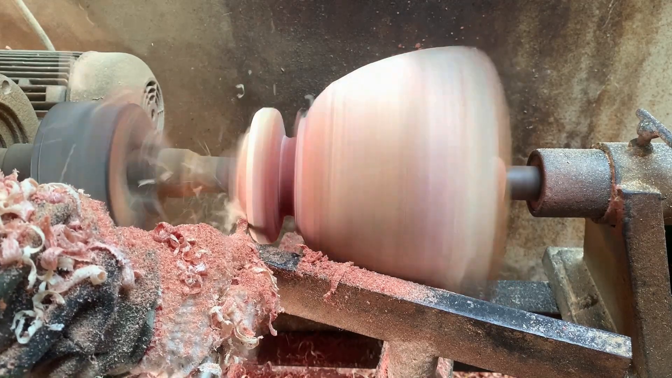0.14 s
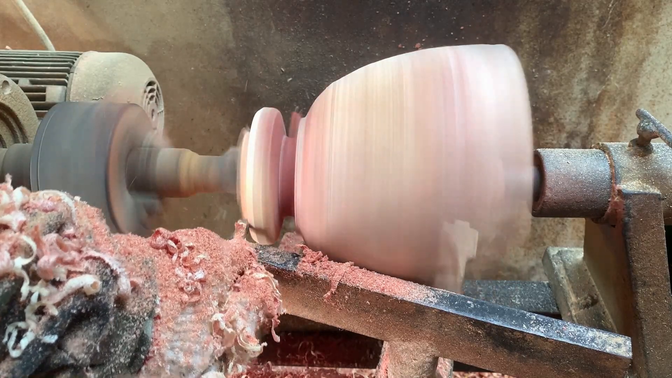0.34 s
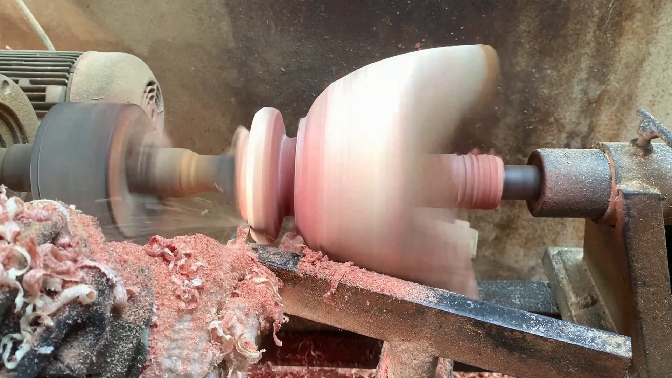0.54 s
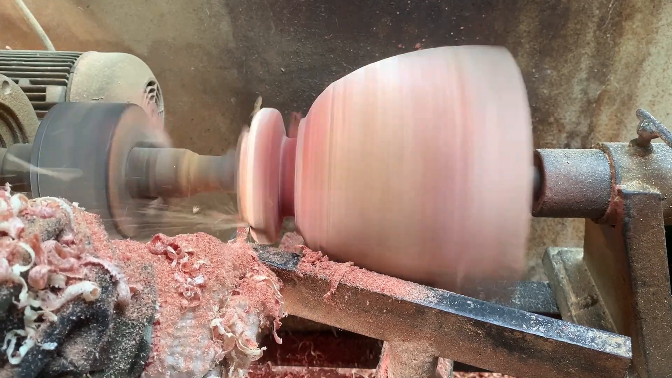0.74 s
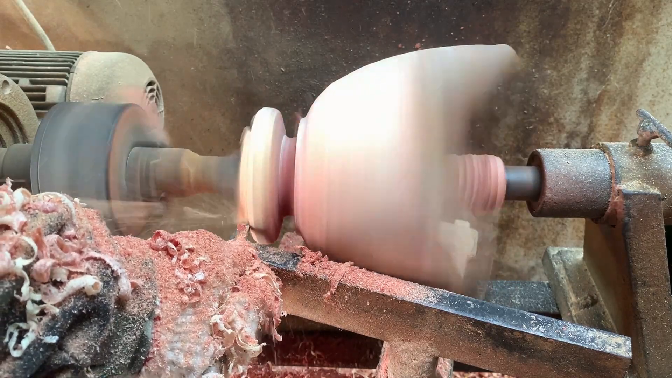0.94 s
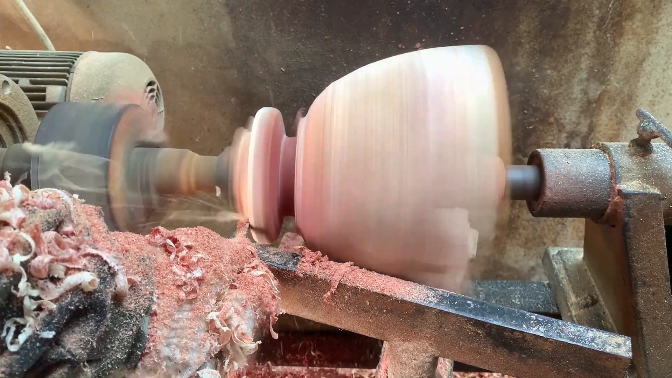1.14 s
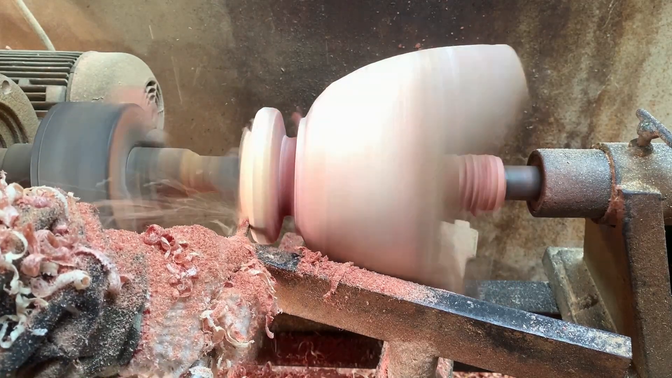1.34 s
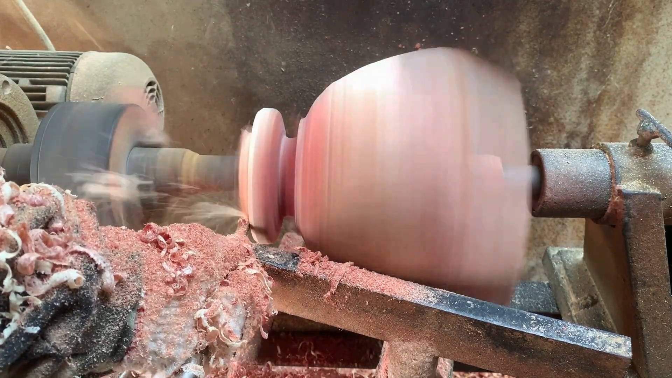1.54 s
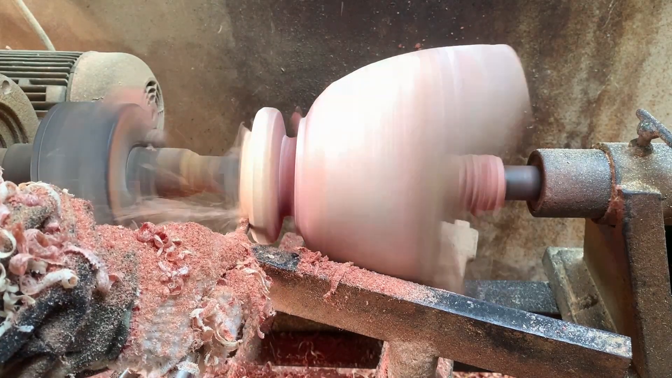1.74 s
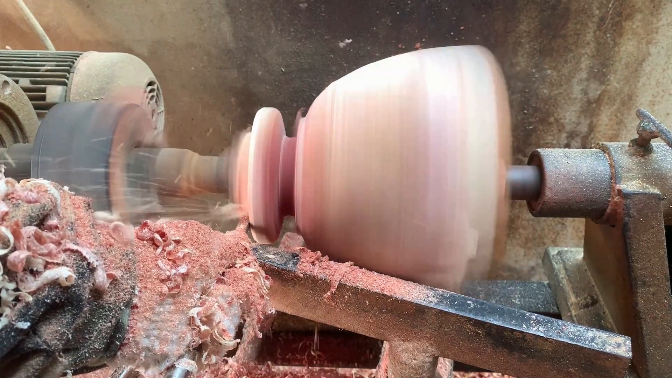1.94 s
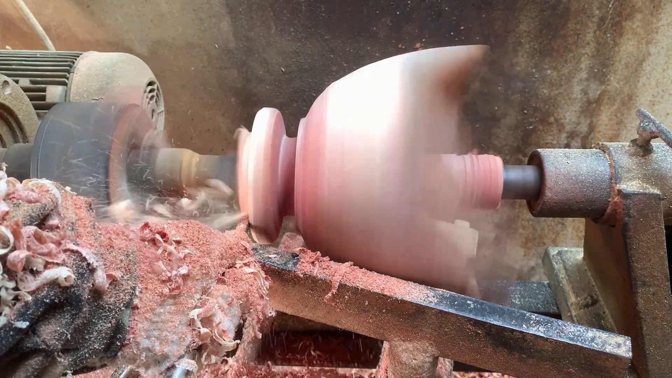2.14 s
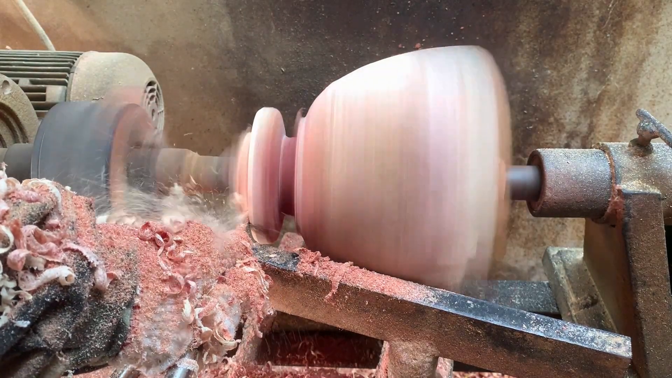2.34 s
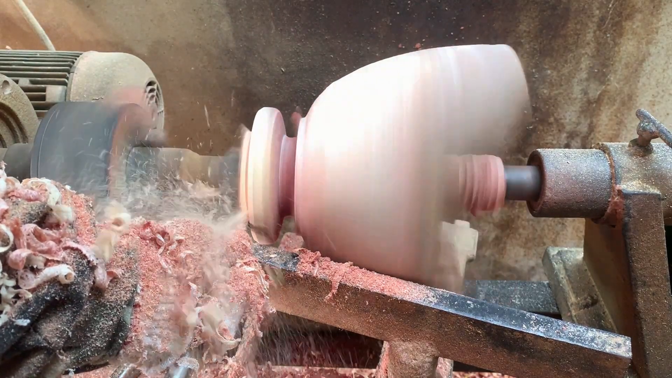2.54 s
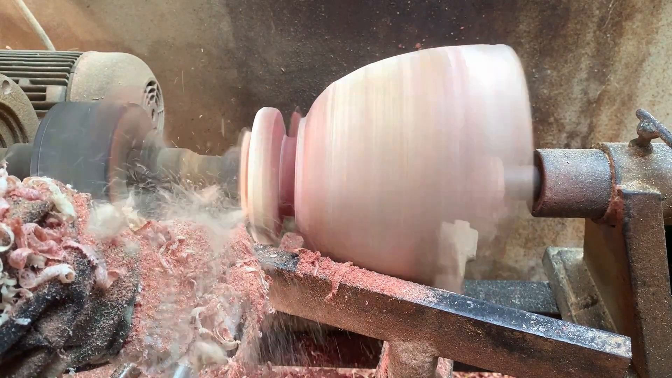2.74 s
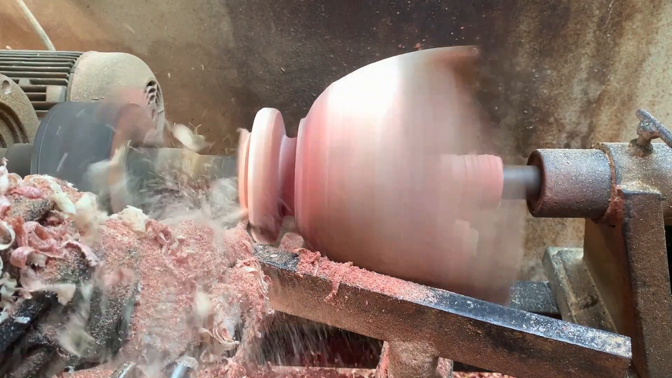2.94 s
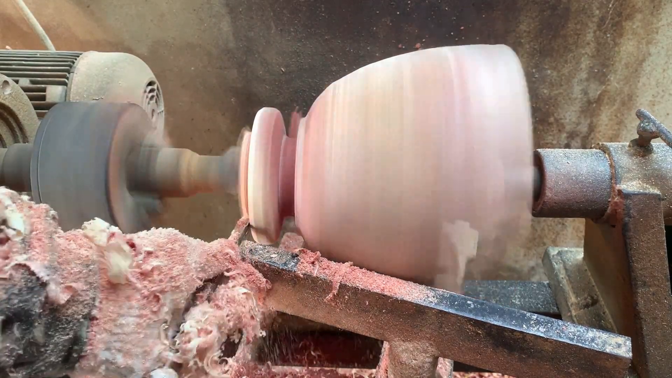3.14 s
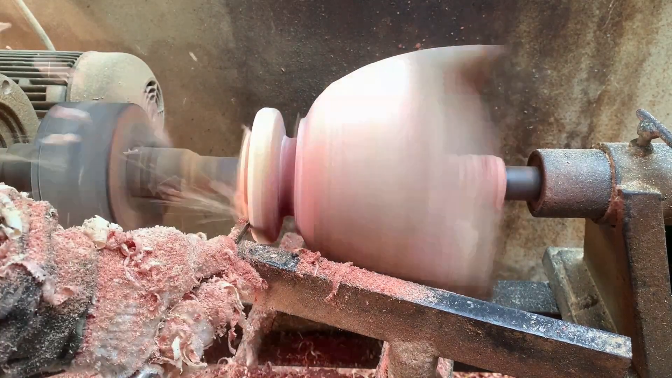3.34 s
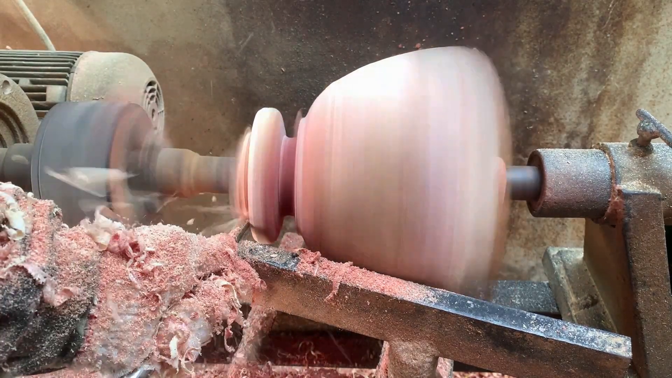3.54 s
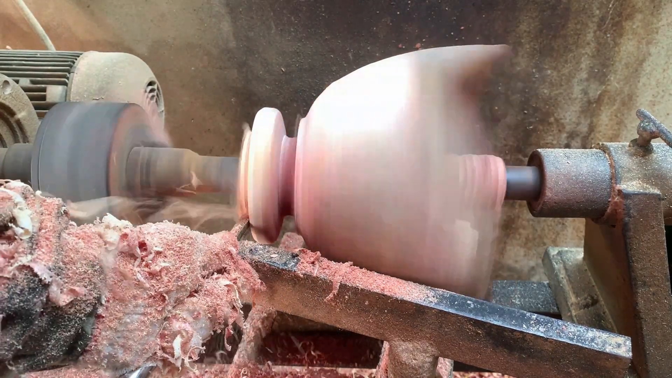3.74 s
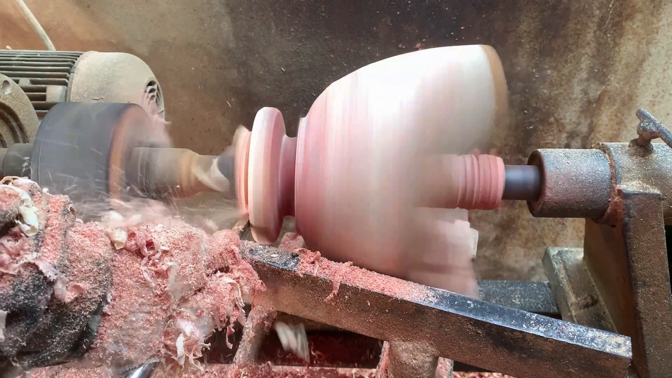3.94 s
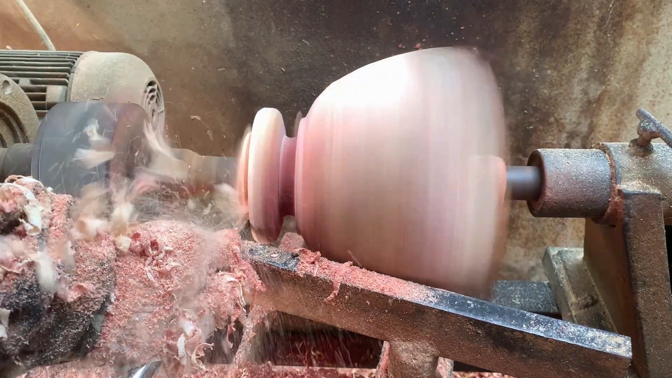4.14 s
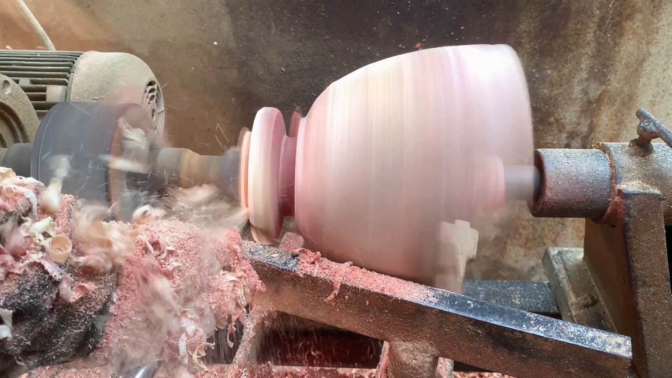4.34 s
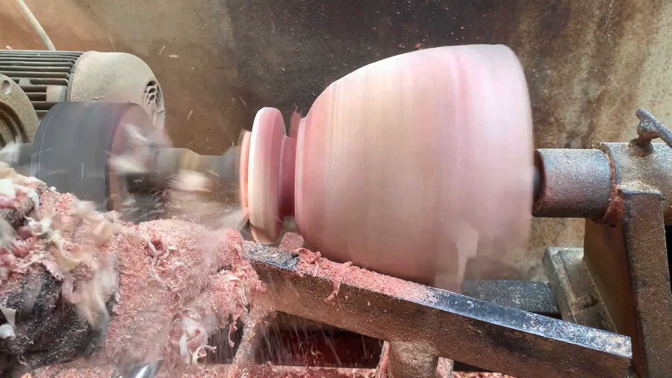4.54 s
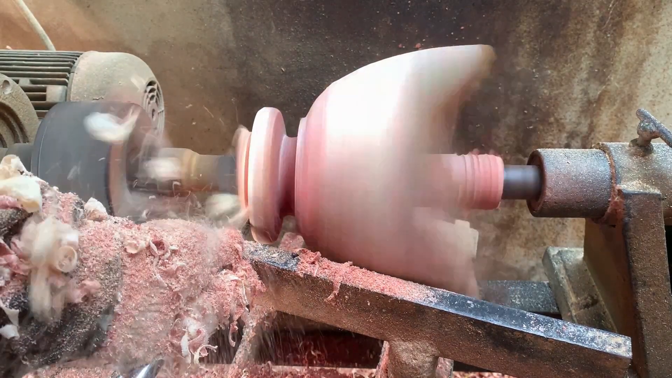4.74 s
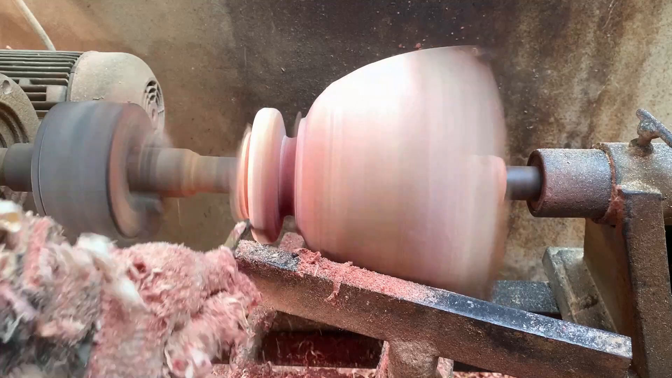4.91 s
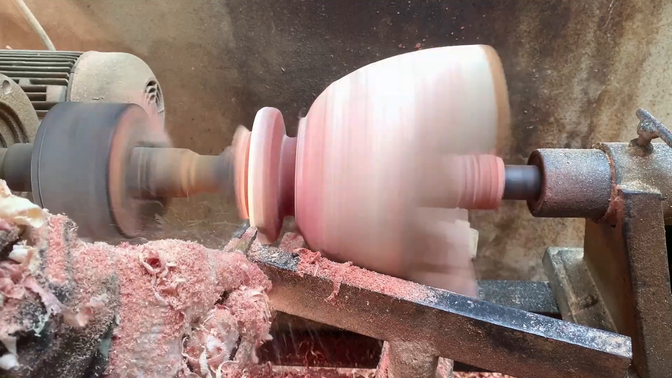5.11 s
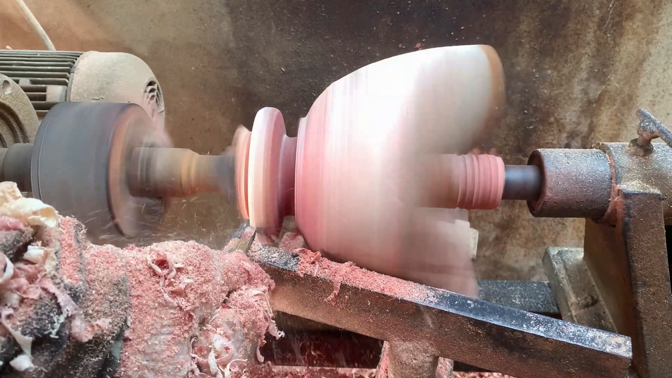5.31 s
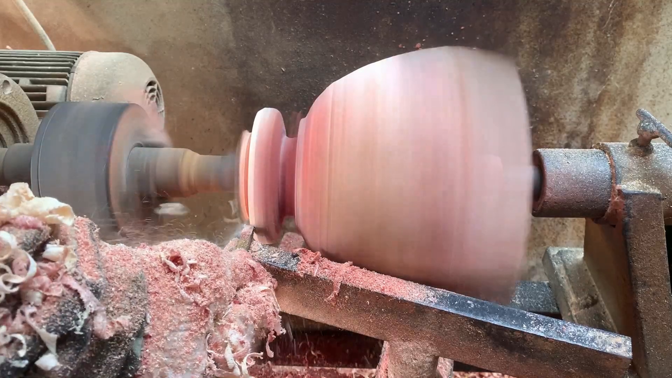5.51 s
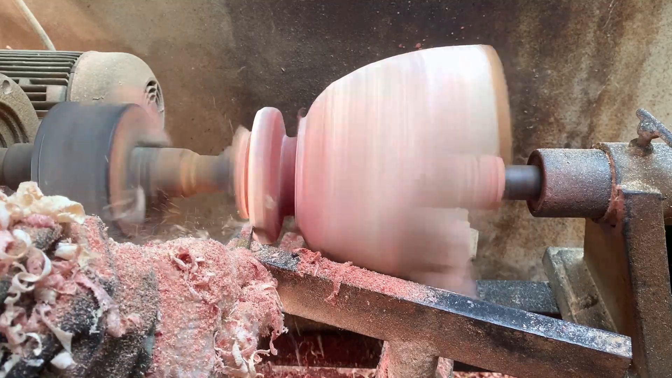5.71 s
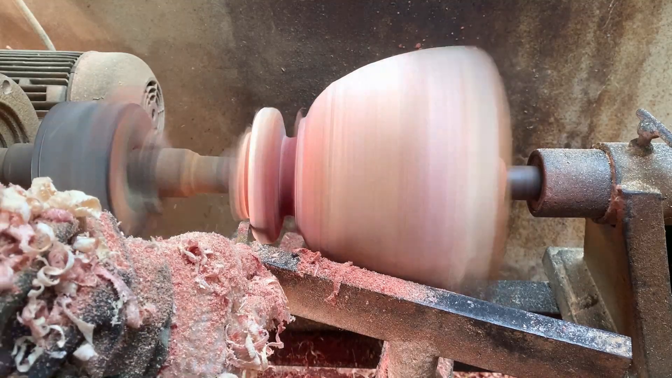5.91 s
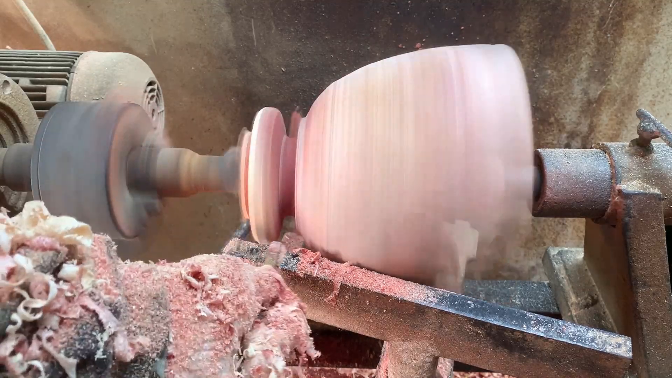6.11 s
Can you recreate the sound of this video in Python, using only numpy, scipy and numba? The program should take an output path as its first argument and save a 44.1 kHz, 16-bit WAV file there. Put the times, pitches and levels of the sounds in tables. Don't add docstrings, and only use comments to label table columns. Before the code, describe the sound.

Close stereo sound of an electric lathe humming in a small workshop. A brief scrape lifts off, then a long cut starts as a thin rub and grows into a harsh, fluttering, chattering rasp. After a short gap a second strong cut follows, with sharp catches and dull wooden knocks. It stops, and a lighter, thin finishing scrape ends near the close, leaving the motor running.

```python
import sys
import numpy as np
from scipy import signal
from scipy.fft import rfft, irfft, next_fast_len
from scipy.io import wavfile
from scipy.ndimage import uniform_filter1d
from numba import njit

SR = 44100
rng = np.random.default_rng(int(sys.argv[2]) if len(sys.argv) > 2 else 0)


def inscribe(sig):
    pcm = np.round(np.clip(np.atleast_2d(sig).T, -1, 1) * 32767)
    wavfile.write(sys.argv[1], SR, pcm.astype(np.int16))


def level_to_linear(level):
    exponent = np.asarray(level, float) / 20
    return 10 ** exponent


N = 272097
TURN_HZ = 18.76

# start_s, lead_turns, twice_a_turn_db, once_a_turn_db, load_db
GRAIN = [(.1, 0.083, 3, 0.9, -8), (.6, 0.18, 5.5, 0.8, -11), (.85, 0.23, 5.5, 1.2, -3.5),
         (1.2, 0.27, 2.5, 3, -1.8), (1.6, 0.29, 3, 2.5, 0), (2, 0.25, 5.5, 2.5, -1.8),
         (2.4, 0.23, 3, -1.8, -1.1), (2.7, 0.12, 1.4, .1, 4), (3, .04, 3.5, -0.4, -1.2),
         (3.4, 0.28, 2, 2.5, -8.5), (3.6, 0.24, 2.5, 4.5, -0.5), (3.8, 0.23, 6, -0.5, 1),
         (4.2, 0.088, 2.2, 1, 3), (4.8, .01, 2.5, 0.1, 1.7), (5.3, 0.2, 3, 0.5, -14),
         (5.7, 0.25, 4.5, 1.3, -10), (5.9, 0.33, 5.5, -1.5, -10.5)]
# pitch_hz, width_hz, level_db
BLANK = [(448.3, 76, -4), (571, 150, -7.5), (972, 240, -12), (1356, 185, -9.5)]
SHANK = [(2900, 122, -2.5), (3274, 160, -9.5), (4306, 370, -0.5)]
# pitch_hz, width_hz, level_db
FLUTE = [(6016, 420, 0.5), (6500, 260, -8.5)]
# pitch_hz, width_hz, level_db
BEVEL = [(7245, 550, -6.5), (13600, 370, -21)]
# pitch_hz, width_hz, level_db
FIBRE = [(8060, 420, 0), (8760, 1120, -5.5)]
# pitch_hz, width_hz, level_db
POINT = [(9705, 450, -0.5)]


def gouge():
    # pitch_hz, width_hz, level_db
    rest = [(2209, 107, -4.5), (2446, 124, 0)]
    # pitch_hz, width_hz, level_db
    hiss = [(1140, 590, -3.5), (1990, 520, 1.5), (3170, 730, -0.5), (3886, 610, -1.5), (5170, 750, -2.5)]
    # pitch_hz, width_hz, level_db
    dust = [(10500, 480, 2.5), (11270, 500, 2), (12200, 660, 1.5), (12800, 540, -2.5), (13800, 970, -3.5)]
    # start_s, depth_db, rub_db, overhang_hz, roll_db (towards a fine scrape)
    opening = [
        (0, -35, -47, 1820, -1),
        (.1, -32.5, -42.5, 1760, -2),
        (.22, -31, -44.5, 1725, -2.5),
    ]
    long_cut = [
        (.62, -42, -36, 1820, -6),
        (.78, -42, -31.5, 1865, -3.5),
        (1.04, -33, -33.5, 1820, -5),
        (1.25, -29, -36, 1840, -3.5),
        (1.65, -25.5, -36.5, 1778, -4),
        (2.25, -28.5, -41.5, 1717, 3.5),
        (2.6, -24.5, -39, 1690, 5),
        (2.86, -24, -43.5, 1616, 8.5),
        (3.01, -26.5, -37, 1627, -1),
    ]
    second = [(3.28, -30.5, -40.5, 1737, -7.5), (3.42, -26, -37.5, 1756, -8), (3.62, -24, -38, 1734, -8),
              (3.82, -25.5, -36, 1702, -7), (4, -24.5, -38.5, 1666, 0.5), (4.4, -26, -43, 1630, 4),
              (4.62, -26.5, -43, 1626, 5.5), (4.84, -28, -46, 1610, 6)]
    finish = [(5.16, -56.5, -43, 1790, 0), (5.3, -47.5, -47.5, 1760, -2), (5.4, -46.5, -41.5, 1750, -2),
              (5.55, -48, -45, 1760, 0), (5.63, -51, -44, 1790, 6), (5.75, -53, -41, 1860, 2),
              (5.88, -44.5, -43.5, 1780, -1.5)]
    follow = {"rest": (-1, 0.9529, 0.06, -11.5), "flute": (.1, 0.028, 0.21, .1),
              "bevel": (-0.73, -0.033, 0.68, -1.5), "tip": (.1, 0.018, 0.93, .1),
              "point": (-1.9, 0.031, 1, 0.24), "hiss": (-7, 0.3176, 0.43, 0.36),
              "dust": (-12.5, 0.28, 1, -0.7)}
    grip = {"rest": [-1.5, 0.22, 0.71, 0.063], "flute": [-1.5, -5.5, -1.3, 2], "bevel": [-.3, 0.44, -0.35,
            -.3], "tip": [.1, .1, .1, .1], "point": [-.4, 1.5, -4, 0.5], "hiss": [.1, 0.087, .1, .1],
            "dust": [-1.5, -1.4, .3, 1.5]}

    lead, twice_db, once_db, load_db = curves(GRAIN)
    angle = 2 * np.pi * (TURN_HZ * np.arange(N) / SR + lead)
    bend = 2 * angle + 0.089 * np.cos(2 * angle)
    swing = twice_db * (np.cos(bend) - 0.54 * np.cos(2 * bend))
    swing = swing + once_db * np.cos(angle + 2 * np.pi * 1.136)
    stroke = rng.standard_normal(300)[(angle / np.pi + 1.5).astype(int)]
    swing = swing + 0.63 * uniform_filter1d(stroke, size=100) + 0.79 * walk(110)
    knot_turns, knot_sharpness = 0.022, 27
    knot = np.exp(knot_sharpness * (np.cos(angle - 2 * np.pi * knot_turns) - 1))
    swing = swing + (1.3 + 1.17 * once_db) * knot

    depth_db, rub_db, hz, roll_db = curves(opening + long_cut + second + finish)
    edge_db, cut = contact()
    short_hz, reach_hz = 1830, 200
    reach = (short_hz - hz) / reach_hz
    part = {}
    for name, (db, share, per_roll, at_reach) in follow.items():
        hand_db = share * depth_db + (1 - share) * rub_db + per_roll * roll_db + at_reach * reach
        part[name] = level_to_linear(db + hand_db + edge_db + np.array(grip[name])[cut])

    low = level_to_linear(depth_db + contact(rings=0.93)[0]) * level(overhang(0.5 * swing, hz), 2.25)
    low = low + part["rest"] * torn(rest, 0.28 * swing, 1.85, 50, 2.8)
    groan = level_to_linear(-39 + load_db + 0.3 * edge_db)
    low = low + groan * torn(BLANK, 1.02 * swing, 1.5, 40, 3.9)
    steel = level_to_linear(rub_db + edge_db) * torn(SHANK, 0.73 * swing, 2.35, 60, 4.2)
    steel = steel + part["flute"] * torn(FLUTE, 0.98 * swing, 1.7, 70, 4.6)
    steel = steel + part["bevel"] * torn(BEVEL, 0.97 * swing, 1.7, 70, 4.0)
    steel = steel + part["tip"] * torn(FIBRE, 0.86 * swing, 0.5, 80, 0.4)
    steel = steel + part["point"] * torn(POINT, 1.14 * swing, 0.6, 80, 0.33)
    spray = part["hiss"] * torn(hiss, 0.6 * swing, 1.43, 90, 10.84)
    spray = spray + part["dust"] * torn(dust, 0.92 * swing, 0.8, 99, 4.6)
    return low + steel + spray + catches()


def overhang(swing_db, hz):
    # pitch_ratio, width_hz, level_db
    chatter = [(.86, 200, -16), (.96, 85, -1.5), (1.005, 70, 0), (1.06, 85, -1.5)]
    out = 0
    for ratio, width, db in chatter:
        centre = ratio * hz * (1 + 0.0067 * walk(12))
        force = noise() * level_to_linear(db + swing_db + 1.65 * walk(45))
        once = [svf(v, centre, 1.5 * width) for v in force]
        out = out + np.array([svf(v, centre, 1.5 * width) for v in once])
    return out


def torn(modes, swing_db, flicker_db, flicker_rate, trim_db):
    force = noise() * level_to_linear(swing_db + flicker_db * walk(flicker_rate))
    return level(ring(force, modes, 1.5), trim_db)


def contact(rings=0):
    # full_contact_s, enter_30_db_s, lift_s, leave_30_db_s, overhang_lets_go_later_s
    cuts = [
        (-0.1, .1, .25, .07, -.02),
        (.585, .14, 3.02, .1, .05),
        (3.262, .095, 4.888, .05, .002),
        (5.16, .015, 5.915, .06, 0),
    ]
    wake_s, apart_db = 0.023, -41
    t = np.arange(N) / SR
    ramps = []
    for s0, enter, s1, leave, late in cuts:
        entering = (t - s0 - rings * wake_s) / enter
        leaving = (s1 + rings * late - t) / leave
        ramps.append(30 * np.minimum(entering, leaving))
    ramps = np.array(ramps)
    return np.clip(ramps.max(axis=0), apart_db, 0), ramps.argmax(axis=0)


def catches():
    # start_s, peak_db, crack_db (above the peak), pitch_hz
    snags = [(1.052, -14.5, 4, 2275), (1.1017, -14.5, 3, 2280), (1.366, -14.5, -8, 1890),
             (1.478, -13, -8, 2400), (1.6291, -11, -1, 1880), (1.6801, -14.5, -14, 1724),
             (1.717, -13, -27, 1680), (2.008, -16, -46, 1725), (2.542, -13.5, -29, 1806),
             (2.9058, -14, -18, 1554), (2.9593, -8.5, -17, 1577), (3.0125, -13, -1, 1600),
             (3.3455, -9.5, -53, 1706), (3.5513, -12.5, -9, 1680), (3.768, -11.5, -20, 1670),
             (3.8088, -23, -22, 1640), (4.2442, -13.5, -32, 1660), (4.2959, -12.5, -30, 1645),
             (4.6702, -12.5, -27, 1680)]
    # start_s, peak_db
    thuds = [
        (4.004, -26),
        (4.059, -23.5),
        (4.111, -36),
    ]
    # start_s, peak_db, pitch_hz
    jolts = [
        (0.718, -32.5, 103),
        (0.759, -38, 129),
        (0.898, -36, 161),
        (1.975, -37, 83),
    ]

    s, peak_db, crack_db, hz = np.transpose(snags)
    push = blows(s, peak_db + crack_db - 4.0, 0 * s, .0015)
    crack = ring(push * noise(), SHANK + FLUTE + BEVEL + FIBRE + POINT)
    thud_s, thud_db = np.transpose(thuds)
    thud = blows(thud_s, thud_db + 3.0, BLANK[0][0] + 0 * thud_s, 0.0049)
    jolt_s, jolt_db, jolt_hz = np.transpose(jolts)
    jolt = blows(jolt_s, jolt_db, jolt_hz, 0.0062)
    return blows(s, peak_db - 0.5, hz, 0.0034) + crack + thud + jolt


def blows(times, peak_db, hz, length_s):
    out, k = np.zeros((2, N + SR)), np.arange(SR // 20) / SR
    shape = (k / length_s) * np.exp(1 - k / length_s)
    phases = rng.random((len(times), 1, 1)) + np.array([[0], [1 / 4]])
    for s, db, f, phase in zip(times, peak_db, hz, phases):
        i = int(s * SR)
        wave = np.cos(np.sign(f) * 2 * np.pi * (f * k + phase))
        out[:, i:i + len(k)] += level_to_linear(db) * shape * wave
    return out[:, :N]


def lathe():
    # start_s, frame_db, rumble_db
    idle = [(0, -40, -50.5), (.5, -38.5, -48), (2.1, -40.5, -50.5), (3.15, -42.5, -53.5),
            (5.05, -44.5, -55), (6.17, -41.5, -51.5)]
    # pitch_hz, width_hz, level_db
    frame_modes = [(445, 75, -9), (624, 55, 1), (759, 142, -9), (1301, 113, -5.5)]
    # pitch_hz, width_hz, level_db
    floor_modes = [(39.4, 38, -10.5), (90.8, 18.6, -0.5), (124, 72, -7), (205, 79, -4), (276, 186, -8.5)]
    # pitch_hz, level_db (per Hz)
    air_colour = [(940, -10.5), (1600, 2.5), (5370, -22.5), (7650, -26.5), (8360, -20), (11000, -50),
                  (14300, -78), (22000, -120)]
    # pitch_hz, width_hz, level_db
    bearing_bands = [(4500, 300, -70), (5470, 250, -66), (6250, 350, -68), (8150, 300, -73)]
    # pitch_ratio, level_db
    tones = [(1, -71), (.5087, -80)]

    frame_db, rumble_db = curves(idle)
    load_db = 4.5 + 0.33 * curves(GRAIN)[-1]
    strain_db = uniform_filter1d(level_to_linear(contact()[0]), size=3000) * load_db
    frame_db, rumble_db = frame_db + strain_db, rumble_db + 0.5 * strain_db
    t = np.arange(N) / SR
    shake = level_to_linear(1.2 * np.cos(2 * np.pi * TURN_HZ * t) + 0.71 * walk(30))
    frame = level_to_linear(frame_db) * level(ring(noise() * shake, frame_modes), 4.56)
    rumble = level_to_linear(rumble_db) * level(ring(noise() * shake * level_to_linear(1.9 * walk(12)), floor_modes), 3.45)
    air = level_to_linear(1.17 * (frame_db + 39.0)) * level(colour(noise() * shake, air_colour, 0.85), -43)
    bearings = sum(level(ring(noise() * shake, [(hz, w, 0)]), db) for hz, w, db in bearing_bands)
    whistle_hz = 12021
    skirt = level(ring(noise(), [(whistle_hz, 150, 0)]), -69)
    lag = np.array([[0], [np.pi / 2]])
    whistle = sum(level_to_linear(db) * np.sin(2 * np.pi * r * whistle_hz * t + lag) for r, db in tones)
    return frame + rumble + air + level_to_linear(-2) * whistle + skirt + bearings


def level(x, db):
    return x * level_to_linear(db) / np.sqrt(np.mean(x ** 2))


def curves(table):
    s, *columns = np.transpose(table)
    return [np.interp(np.arange(N) / SR, s, c) for c in columns]


@njit
def svf(x, hz, width):
    y, b, l = np.empty(len(x)), 0., 0.
    for i in range(len(x)):
        g, k = np.tan(np.pi * hz[i] / SR), width / hz[i]
        v = (b + g * (x[i] - l)) / (1 + g * (g + k))
        b, l, y[i] = 2 * v - b, l + 2 * g * v, k * v
    return y


def ring(x, modes, wander_db=0):
    size = next_fast_len(N, real=True)
    f, spectrum, out = np.fft.rfftfreq(size, 1 / SR) + 1, rfft(x, size), 0
    for k, (hz, width, db) in enumerate(modes):
        gain = 1 / (1 + 1j * (f * f - hz * hz) / (1.5 * width * f)) ** 2
        swell = level_to_linear(db + wander_db * walk(9))
        out = out + (-1) ** k * swell * irfft(spectrum * gain, size)[:, :N]
    return out


def colour(x, points, scale):
    hz, db = np.transpose(points)
    size = next_fast_len(N, real=True)
    axis = np.log(np.fft.rfftfreq(size, 1 / SR) + 1)
    gain = level_to_linear(scale * np.interp(axis, np.log(hz), db))
    return irfft(rfft(x, size) * gain, size)[:, :N]


def walk(rate):
    k = int(SR / rate)
    steps = np.repeat(rng.standard_normal(N // k + 1), k)
    w = uniform_filter1d(uniform_filter1d(steps, k), k)[:N]
    return w / w.std()


def noise():
    return rng.standard_normal((2, N))


def scene():
    # pitch_hz, width_hz, share_removed
    bench_dips = [(5580, 510, 0.37), (7800, 220, 0.54)]
    t60_s, room_db = 0.2, -13
    cut, t = gouge(), np.arange(SR // 2) / SR
    tail = rng.standard_normal((2, len(t))) * level_to_linear(-60 * t / t60_s) * (t > .004)
    tail = np.pad(tail, ((0, 0), (0, N - len(t))))
    tail = colour(tail, [(1000, 1.5), (12000, -9.5)], 0.86)[:, :len(t)]
    wet = signal.fftconvolve(cut, tail / np.sqrt(np.sum(tail ** 2) / 2), axes=1)[:, :N]
    for hz, width, share in bench_dips:
        cut = cut - share * np.array([svf(v, hz * np.ones(N), 1. * width) for v in cut])
    return cut + level_to_linear(room_db) * wet + lathe()


def low_pass(x):
    return signal.sosfilt(signal.butter(12, 15720, fs=SR, output="sos"), x)


def record(dry):
    # pitch_hz, left_minus_right_db
    ports = [(60, -5), (110, -4), (200, -4.5), (380, -1), (700, -1), (1290, 0.0), (2380, -0.5), (4400, 0),
             (8120, -4.5), (15000, 1.5)]
    # pitch_hz, width_hz, share_removed
    shadow = (8640, 2000, 0.99)
    mix = colour(dry, ports, np.array([[.5], [-.5]]))
    hz, width, share = shadow
    mix[0] -= share * svf(mix[0], hz * np.ones(N), 1. * width)
    return low_pass(mix)


dry = scene()
out = record(dry)
inscribe(out)
```